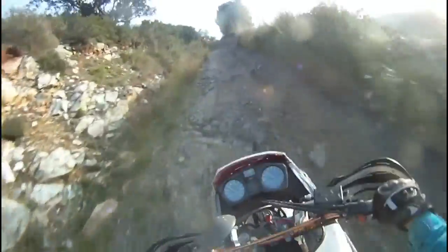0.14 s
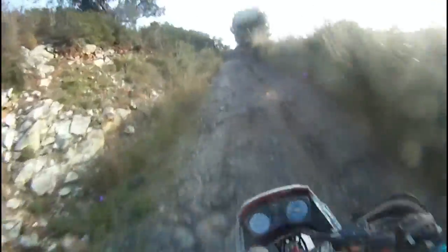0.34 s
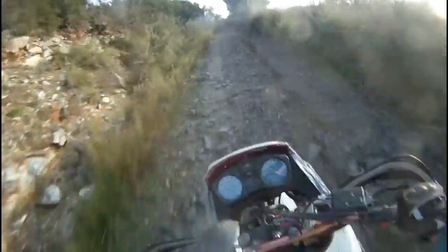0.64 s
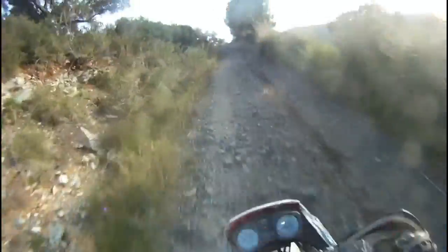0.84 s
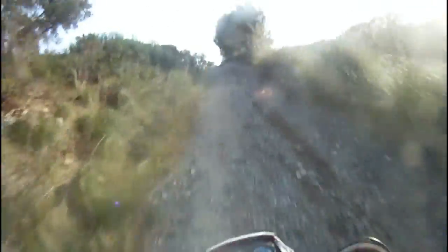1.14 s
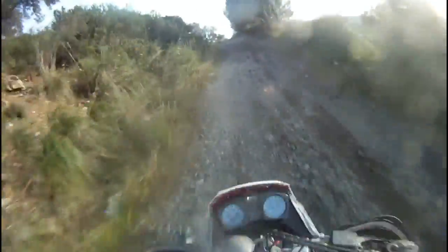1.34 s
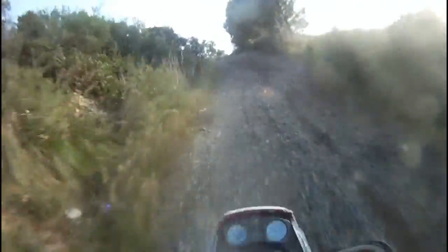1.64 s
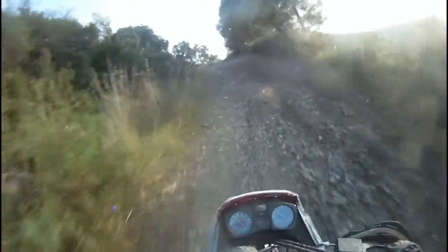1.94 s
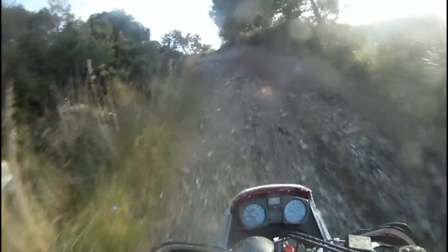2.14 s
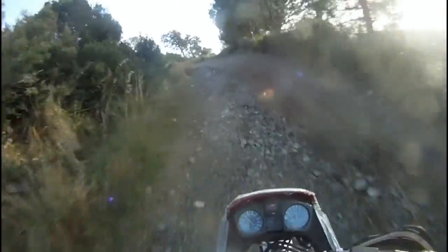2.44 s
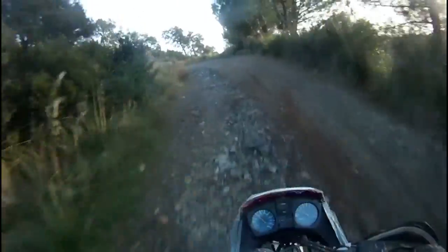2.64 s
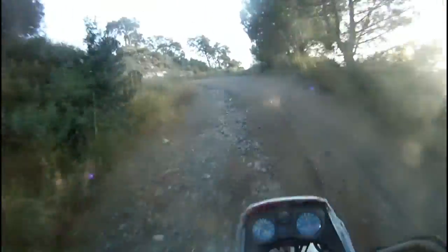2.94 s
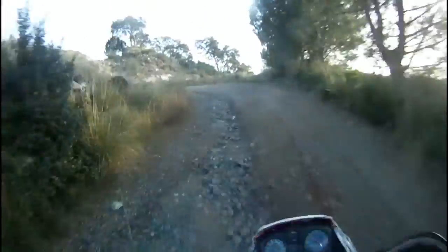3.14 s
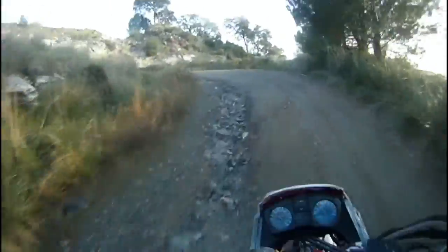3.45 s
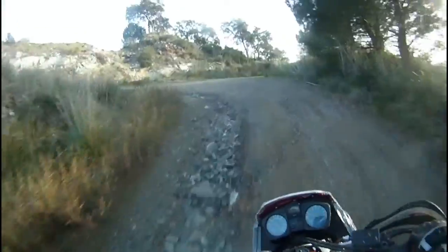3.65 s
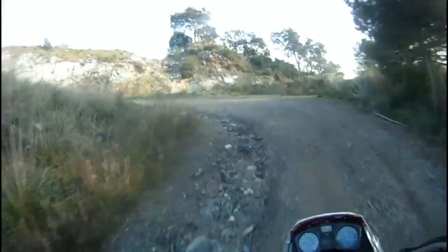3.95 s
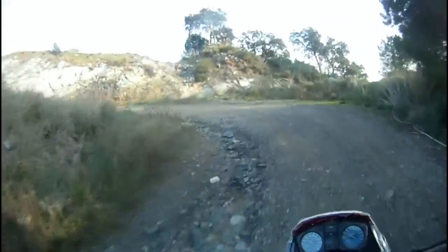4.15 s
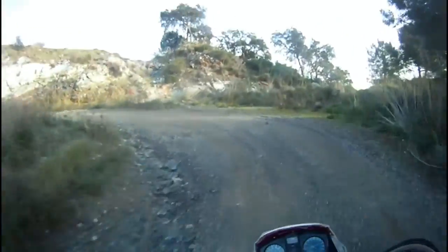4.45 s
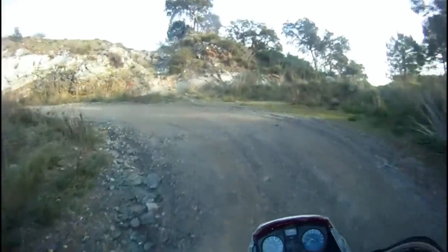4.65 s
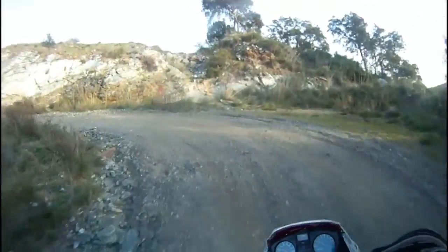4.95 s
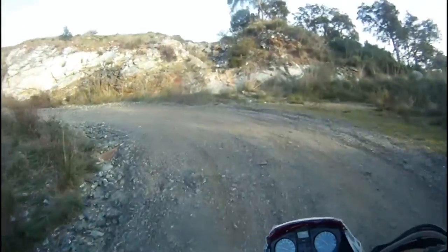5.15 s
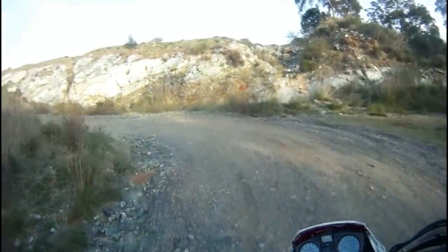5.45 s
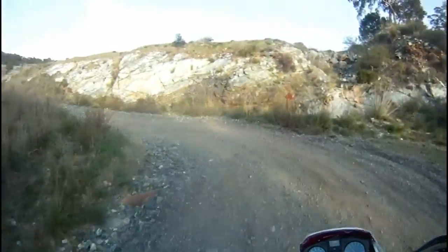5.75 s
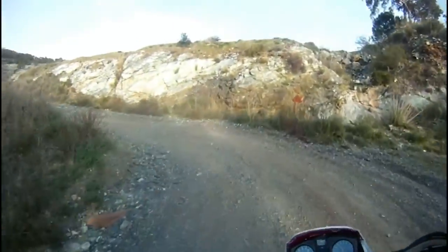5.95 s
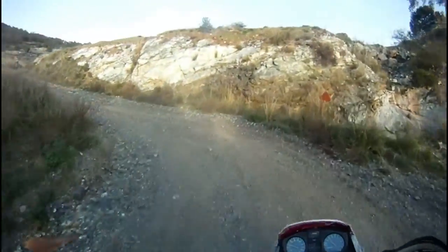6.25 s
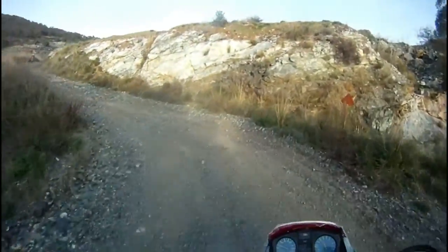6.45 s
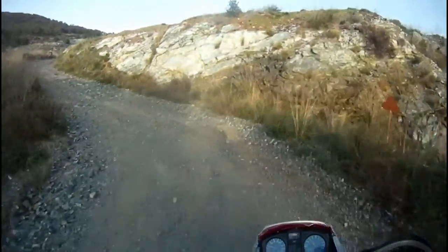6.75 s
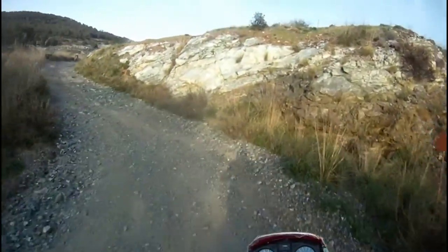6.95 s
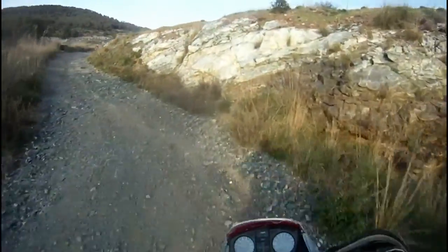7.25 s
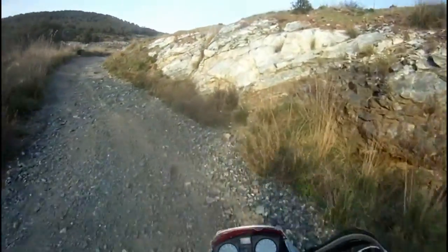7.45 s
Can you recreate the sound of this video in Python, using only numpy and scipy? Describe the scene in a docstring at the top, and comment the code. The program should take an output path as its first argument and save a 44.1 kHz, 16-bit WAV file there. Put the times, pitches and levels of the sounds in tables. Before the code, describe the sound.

Close onboard sound of a rattly motorbike on stony ground. It begins loud: rapid chugging strokes, loose metal clatter, whining gears, hissing tyres and low wind gusts, the throttle jerking the pitch up and down. A cluster of short knocks rattles by. Then the bike slows, strokes become more separate and the gravel rush thins out. Finally the engine pulls again more softly round a bend, with metallic ticking and a brief low thump. The microphone sounds small, boxed-in and grainy.

```python
"""A single-cylinder four-stroke motorcycle lugs up a gravel track, heard from a camera on the rider.
First firing bursts bark, thud and clatter, gear teeth whine, and noise makes tyre rush and wind gusts.
From 0.46 s, faintly at first, short noise knocks rattle; after 3.3 s rush and firing rate sink.
From 5.3 s it pulls through a bend with valve ring and one late deep thump as the throttle opens.
Throughout, the camera samples coarsely, which mirrors the sound into the treble."""
import sys
import numpy as np
from scipy import signal
from scipy.fft import rfft, irfft, next_fast_len
from scipy.io import wavfile
from scipy.ndimage import uniform_filter1d, map_coordinates

SR = 44100
rng = np.random.default_rng(int(sys.argv[2]) if len(sys.argv) > 2 else 0)


def unload_audio(sound):
    """Save the sound as a 16-bit wav file, at the path given as the first command line argument."""
    columns = np.transpose(np.atleast_2d(sound))
    # keep every value between -1 and 1, then stretch to whole-number steps
    steps = np.round(np.clip(columns, -1, 1) * 32767)
    wavfile.write(sys.argv[1], SR, steps.astype(np.int16))


N = 335160
TIME = np.arange(N) / SR  # s


# firing rate, one firing per engine cycle: [t/s, f/Hz]
FIRING_RATE = [(0.0, 24.63), (1.13, 27.54), (1.54, 25.22), (1.88, 30.02), (2.22, 23.1), (2.34, 32.0),
               (2.61, 24.34), (3.33, 26.17), (3.44, 20.85), (3.68, 17.02), (3.84, 26.3), (4.16, 20.16),
               (4.51, 15.9), (4.96, 17.5), (5.02, 19.4), (5.35, 19.1), (5.44, 21.4), (5.76, 21.25),
               (5.92, 27.3), (6.25, 20.52), (6.37, 25.17), (6.75, 25.75), (6.84, 21.36), (7.06, 24.57),
               (7.24, 19.71), (7.6, 20.99)]
# relative spectrum of loose metal, also heard in the knocks: [f/Hz, level/dB per Hz]
CLATTER_SPECTRUM = [(100, -23), (250, -8.5), (500, -6), (800, -9), (1150, -2.5), (1450, -3), (1750, -6.5),
                    (2300, -6.5), (2900, -20), (4100, -22), (5800, -20)]
# relative strength of the crank shake: [multiple of the firing rate, level/dB]
CRANK_SHAKE = [(2, 0.5), (3, -30.5), (4, -1), (5, -4)]


def engine(cycles, effort_db):
    """Each firing barks, thuds and sets off a burst of clatter, over the low shake of the crank."""
    speed, = curves(FIRING_RATE)
    effort_change_db = effort_db - effort_db.mean()

    # slow strokes on an open throttle bark the most
    throttle = np.minimum(1, amp(effort_change_db / 2))
    slow_stroke = np.minimum(1, 21 / speed) ** 2
    bark = amp(.5) * throttle * slow_stroke * barks(cycles, scatter_db=1.5, jitter_s=.00008)

    thud = amp(-6.0) * thuds(cycles, scatter_db=1.5, jitter_s=0.00012)

    burst = swell(cycles, lag=-.04, depth_db=6)
    loose_metal = rng.standard_normal(N) * burst * amp(2.0 * wobble(260))
    clatter = amp(5.0) * housed(loose_metal, CLATTER_SPECTRUM)

    shake = np.zeros(N)
    for order, db in CRANK_SHAKE:
        shake += amp(db + 2 * wobble(6)) * np.sin(2 * np.pi * order * cycles)
    # the engine rocks harder under load
    shake = amp(-40.5 + 0.33 * effort_change_db) * unit(shake)
    return amp(effort_db) * (bark + thud + clatter) + shake


# exhaust resonances, time counted from the firing, relative levels: [t/s, length/s, f/Hz, level/dB]
EXHAUST_BARKS = [(-.017, .028, 232, -2.5), (-.013, .014, 305, 0), (-.009, .014, 415, 0),
                 (-.007, .018, 545, -2), (-.004, .013, 610, -6), (.007, .016, 400, -8)]


def barks(cycles, scatter_db, jitter_s):
    """Nearly the same puff of gas in every cycle, so the strokes stack into low harmonics."""
    firings = np.interp(np.arange(1, int(cycles[-1]) + 1), cycles, TIME)
    out = np.zeros(N + SR)
    for delay, length, hz, db in EXHAUST_BARKS:
        chance = rng.standard_normal((len(firings), 2))
        t = np.arange(int(length * SR)) / SR
        puff = np.sin(2 * np.pi * hz * t) * np.sin(np.pi * t / length)
        puffs = puff * amp(db + scatter_db * chance[:, 1:])
        starts = np.abs(firings[:, None] + delay + jitter_s * chance[:, :1])
        at = (starts * SR).astype(int) + np.arange(len(t))
        out += np.bincount(at.ravel(), puffs.ravel(), N + SR)
    return housed(out[:N], [(100, 2.5), (700, -4.5)])


# blows within one engine cycle, relative levels: [share of the cycle after the firing, level/dB]
CYCLE_BLOWS = [(-.19, -11.5), (-.08, -5), (0, 3), (0.118, -9.5), (0.502, -4.5)]
# relative spectrum of a blow: [f/Hz, level/dB per Hz]
THUD_SPECTRUM = [(25, -48), (60, -4), (100, -3), (160, 13), (300, 3), (550, -18), (720, -13), (1000, -14),
                 (1400, -3), (2200, -2), (3500, -10), (5500, -46)]


def thuds(cycles, scatter_db, jitter_s):
    """The same run of blows in every cycle, each a little off in size and time."""
    turn = np.arange(int(cycles[-1]) + 2)
    blows = np.zeros(N)
    for share, db in CYCLE_BLOWS:
        chance = rng.standard_normal((len(turn), 2))
        at = np.interp(turn + share, cycles, TIME, left=-1, right=-1)
        at = at + jitter_s * chance[:, 0]
        heard = (at > 0) & (at < TIME[-1])
        sizes = amp(db + scatter_db * chance[heard, 1])
        blows += np.bincount((at[heard] * SR).astype(int), sizes, N)
    return housed(blows, THUD_SPECTRUM)


# twists of the throttle, short blips add to long pulls: [t/s at the start, length/s, level/dB]
THROTTLE_TWISTS = [(-.07, 0.059, -21.5), (.08, 1.53, -39.5), (0.4, 0.071, -36), (1.22, 0.29, -43.5),
                   (1.513, 0.058, -36), (1.732, 0.37, -45), (2.212, 0.12, -34.5), (2.3, .76, -40.5),
                   (2.596, 0.067, -39.5), (3.149, 0.16, -37), (3.738, 0.18, -39), (3.947, 0.94, -51.5),
                   (4.934, 0.13, -42.5), (5.128, 2.067, -44.5), (5.33, 0.45, -50.5), (5.786, .14, -41),
                   (6.048, 0.058, -37.5), (6.285, .11, -38), (6.6, 0.088, -42), (6.855, .08, -40.5),
                   (7.265, .4, -46.5), (7.534, 0.082, -49)]
OPEN_S, CLOSE_S, IDLE_DB = 0.032, 0.047, -53  # the pull builds, dies away, and rests at this level


def pull():
    """How hard the engine pulls, in dB: every twist of the throttle adds to the idle."""
    twists = sum(amp(db) * held(start, length, OPEN_S, CLOSE_S) for start, length, db in THROTTLE_TWISTS)
    return 20 * np.log10(amp(IDLE_DB) + twists)


# relative spectrum of the ringing gear case: [f/Hz, level/dB per Hz]
GEARCASE_SPECTRUM = [(500, -26.5), (1000, -13), (1150, 1), (1320, 8), (1490, 1.5), (1680, 0), (2000, -9),
                     (4000, -36.5)]


def gears(cycles, effort_db, kick, flutter, hash_db):
    """Teeth mesh at a multiple of the crank speed, which leaps at each firing and sags until the next."""
    meshes_per_cycle, surge, rough = 69, .06, .32
    speed, = curves(FIRING_RATE)
    # kick is the share of the cycle in which the crank speeds up
    saw = np.interp((cycles + 0.083) % 1, [0, kick, 1], [-1, 1, -1])
    # the crank surges most when it pulls hard at low speed
    swing = surge * (20 / speed) ** 2 * amp((effort_db - effort_db.mean()) / 4)
    pitch = meshes_per_cycle * speed * (1 + swing * saw + flutter * wobble(220))
    tone = np.sin(2 * np.pi * np.cumsum(pitch) / SR) * (1 + rough * wobble(300))
    # the teeth are loaded by compression and again by the power stroke
    load = swell(2 * cycles, lag=.2, depth_db=2.5)
    whine = housed(tone * load, GEARCASE_SPECTRUM)
    # at higher speed the teeth rattle and the whine turns to a hash
    rattle = amp(hash_db) * (speed / 24) ** 2 * housed(rng.standard_normal(N), GEARCASE_SPECTRUM)
    return amp(whine_level(effort_db, speed)) * (whine + rattle)


# the whine swells (+) or fades (-): [t/s at the start, length/s, level/dB]
WHINE_SWELLS = [(1.59, 0.58, -9.5), (3.394, 0.69, 3), (4.22, 0.45, -5), (4.444, 0.2, -2.5), (4.677, 0.6, 1),
                (4.856, 0.12, -5), (5.372, 0.43, -2.5), (7.238, 0.17, 2)]
WHINE_SWELL_S = 0.0097  # time constant at the start and end of each
# at mean pull and speed; dB per dB of pull; dB per firing a second
WHINE_DB, WHINE_PER_PULL, WHINE_PER_SPEED_DB = -36, 0.084, 0.16


def whine_level(effort_db, speed):
    """Level in dB: it follows the pull and the speed, plus the swells and fades of the whine."""
    swells_db = sum(db * held(start, length, WHINE_SWELL_S, WHINE_SWELL_S)
                    for start, length, db in WHINE_SWELLS)
    pull_db = WHINE_PER_PULL * (effort_db - effort_db.mean())
    speed_db = WHINE_PER_SPEED_DB * (speed - speed.mean())
    return WHINE_DB + pull_db + speed_db + swells_db


# ringing tones of the valve gear, relative levels: [f/Hz, level/dB]
VALVE_TONES = [(3110, -2), (3680, -5.5), (4615, -3), (5400, -14.5)]


def valves(cycles, db):
    """The valves seat twice a cycle; their ring stands out while the bike pulls through the bend."""
    bend = np.interp(TIME, [5.25, 5.45, 7.1, 7.22], [.15, 1, 1, .15])
    ages = [(cycles - share) % 1 for share in (.24, .56)]  # in cycles since each seating
    ticks = unit(sum(age * np.exp(-age / .06) for age in ages))
    ring = np.zeros(N)
    for hz, level in VALVE_TONES:
        ring += amp(level) * np.sin(2 * np.pi * hz * TIME + wobble(120)) * amp(2 * wobble(35))
    return amp(db) * bend * ticks * ring


# short knocks, many on the firing strokes, level before the rise and decay shape it: [t/s, level/dB]
KNOCKS = [(0.459, -27), (1.147, -15), (1.317, -13), (1.367, -8), (1.406, -8.5), (1.446, -16),
          (1.516, -11.5), (1.571, -17), (2.629, -17), (3.227, -16), (3.784, -16), (4.33, -23),
          (4.684, -21.5), (5.674, -17), (5.855, -20), (6.266, -16.5), (6.319, -12), (6.882, -16.5),
          (6.929, -17.5), (7.187, -15.5)]


def knocks(t60, rise_s):
    """Each knock is a short loose rattle: noise that rises fast and dies away."""
    t = np.arange(SR // 8) / SR
    shape = amp(-60 * t / t60) * (1 - np.exp(-t / rise_s))
    envelope = np.zeros(N + SR)
    for s, db in KNOCKS:
        envelope[round(s * SR):][:len(t)] += amp(db) * shape
    return envelope[:N] * housed(rng.standard_normal(N), CLATTER_SPECTRUM)


# relative spectrum of tyre and air rush: [f/Hz, level/dB per Hz]
RUSH_SPECTRUM = [(60, 11.5), (200, 1), (500, -7.5), (850, -1), (1150, -1), (1700, 0), (2400, 1.5),
                 (3100, -1.5), (3700, -10), (4100, -12.5), (4700, -6.5), (5450, -7), (5900, -12)]


def track(rush_db, stones_per_s, stone_db):
    """Air and tyres rush as unsteady noise; single stones crackle in the tread."""
    struck = rng.random(N) < stones_per_s / SR
    stones = struck * rng.standard_normal(N) * amp(2 * rng.standard_normal(N))
    rush = rng.standard_normal(N) * amp(0.99 * wobble(35))
    grit = rush + amp(stone_db) * unit(stones)
    return amp(rush_db + 8) * housed(grit, RUSH_SPECTRUM)


# gusts on the camera and, in the last row, a deep thump as the throttle opens:
# [t/s at the peak, length/s, buffet level/dB, deep pressure level/dB]
LOW_PULSES = [(0, 0.086, -23.5, -18.5), (0.258, 0.26, -20.5, -27), (0.457, 0.059, -20, -43),
              (0.567, 0.27, -29, -23), (0.77, 0.14, -21.5, -40), (1.29, .1, -27, -31),
              (1.477, 0.13, -24.5, -36), (2.042, 0.17, -25, -47), (2.278, 0.11, -20.5, -63),
              (2.61, 0.11, -23.5, -49), (3.114, 0.11, -27.5, -34), (3.478, 0.096, -27.5, -50),
              (3.64, 0.1, -26, -59), (6.322, 0.13, -47, -37)]
# relative spectrum of the buffet: [f/Hz, level/dB per Hz]
BUFFET_SPECTRUM = [(20, -20), (45, -14), (65, -6), (82, 4), (100, -3), (130, -14), (200, -23.5),
                   (400, -31.5), (700, -42), (1500, -70)]
# relative spectrum of the deep pressure: [f/Hz, level/dB per Hz]
DEEP_SPECTRUM = [(10, -5), (22, -2), (34, -4), (55, -2), (80, -1), (200, -31), (600, -41.5)]
# between the pulses: level at mean rush, dB per dB of rush
BUFFET_DB, BUFFET_PER_RUSH = -34.5, 0.37
DEEP_DB, DEEP_PER_RUSH = -45, 1


def headwind(rush_db, restless_db):
    """Buffet and deep pressure follow the pace of the bike; bell-shaped gusts and a late thump ride on top."""
    pace_db = rush_db - rush_db.mean()
    buffet = amp(BUFFET_DB + BUFFET_PER_RUSH * pace_db + restless_db * wobble(12))
    deep = amp(DEEP_DB + DEEP_PER_RUSH * pace_db + restless_db * wobble(5.26))
    for s, length, buffet_db, deep_db in LOW_PULSES:
        bell = np.exp(-(2 * (TIME - s) / length) ** 2)
        buffet = np.hypot(buffet, amp(buffet_db) * bell)
        deep = np.hypot(deep, amp(deep_db) * bell)
    return wind(20 * np.log10(buffet), BUFFET_SPECTRUM) + wind(20 * np.log10(deep), DEEP_SPECTRUM)


def wind(level_db, spectrum):
    """Eddies boom in the housing, evened out so that they swell with the given level."""
    eddies = housed(rng.standard_normal(N), spectrum)
    strength = np.sqrt(np.abs(uniform_filter1d(eddies ** 2, size=SR // 12)) + 0.12)
    return amp(level_db) * eddies / strength


# resonances of the camera housing: [f/Hz, width/Hz, level/dB]
HOUSING_MODES = [(254, 61, 3), (395, 39, 3), (552.6, 14, 8.5), (609, 11.7, 7.5), (1006, 47, 6),
                 (1153.4, 98, 12.5), (1236, 29, 11), (1418.6, 53, 8.5), (1528, 142, 8.5), (1792, 59, 4),
                 (2143, 385, 9), (2780, 410, 3.5), (3637, 385, 10.5)]


def housed(x, spectrum, size=8192):
    """Colour x causally by a spectrum and by the ringing housing; rms 1."""
    hz = np.fft.rfftfreq(size, 1 / SR)
    f, level = np.transpose(spectrum)
    db = np.interp(np.log(hz + 1), np.log(f), level)
    for centre, width, peak in HOUSING_MODES:
        db = db + peak / (1 + (2 * (hz - centre) / width) ** 2)
    # folding the cepstrum makes the response minimum-phase
    cepstrum = irfft(np.log(amp(db)))
    cepstrum[1:size // 2] *= 2
    cepstrum[size // 2 + 1:] = 0
    impulse = irfft(np.exp(rfft(cepstrum)))
    return unit(signal.fftconvolve(x, impulse)[:N])


def swell(cycles, lag, depth_db):
    """A gain of rms 1 that peaks once in each cycle counted."""
    return unit(amp(depth_db * np.cos(2 * np.pi * (cycles - lag))))


def held(start, length, rise_s, fall_s):
    """A gain that rises towards 1, holds and dies away."""
    age = np.maximum(TIME - start, 0)
    rise = 1 - np.exp(-np.minimum(age, length) / rise_s)
    fall = np.exp(-np.maximum(age - length, 0) / fall_s)
    return rise * fall


def wobble(rate):
    """A smooth random curve, rate knots a second."""
    return map_coordinates(rng.standard_normal(int(N * rate / SR) + 4), [TIME * rate])


def curves(rows):
    """One value per sample for each column after the time."""
    s, *cols = np.transpose(rows)
    return [np.interp(TIME, s, c) for c in cols]


def amp(db):
    """Decibels to gain."""
    return 10 ** (np.asarray(db) / 20)


def unit(x):
    """Scale to rms 1."""
    return x / np.sqrt(np.mean(x ** 2) + 1e-20)


def filtered(x, response):
    """x times a response of frequency."""
    m = next_fast_len(N + SR // 2)
    return irfft(rfft(x, m) * response(np.fft.rfftfreq(m, 1 / SR)), m)[:N]


# pace of the tyre and air rush, falling as the bike slows for the bend; track adds 8 dB: [t/s, level/dB]
RUSH_LEVEL = [(0, -33.5), (.75, -34), (1.6, -31), (2.4, -37), (3.25, -36.5), (3.55, -40), (3.9, -40),
              (4.3, -48), (4.85, -55), (5.2, -53), (5.4, -48), (6.4, -49.5), (7.6, -53)]
SPRAY_PER_PULL = 0.13  # the rear tyre digs in: dB of rush per dB of pull
BUMP_DB, BUMPS_PER_S = 1.24, 11  # the rush rises and falls over the uneven ground


def scene():
    """All sources ride along with the camera."""
    speed, = curves(FIRING_RATE)
    rush_db, = curves(RUSH_LEVEL)
    cycles, effort_db = np.cumsum(speed) / SR, pull()
    motor = engine(cycles, effort_db)
    whine = gears(cycles, effort_db, kick=0.2, flutter=0.01088, hash_db=2.5)
    metal = valves(cycles, db=-49.5) + knocks(t60=0.037, rise_s=0.0016)
    ground_db = SPRAY_PER_PULL * (effort_db - effort_db.mean()) + BUMP_DB * wobble(BUMPS_PER_S)
    tyres = track(rush_db + ground_db, stones_per_s=700, stone_db=-5.5)
    return (motor + whine + metal + tyres + headwind(rush_db, restless_db=1.0))[None]


SAMPLE_HZ, EDGE_HZ, TOP_HZ = 12000, 5620, 15350  # coarse rate, band edge before it, limit after it


def record(dry):
    """The camera holds each coarse sample, so the sound is mirrored round its sampling rate."""
    band = filtered(dry[0], lambda hz: 1 / np.sqrt(1 + (hz / EDGE_HZ) ** 60))
    mirrored = band * (1 + 2 * np.cos(2 * np.pi * SAMPLE_HZ * TIME))
    # holding each sample dulls the treble as a sinc
    return filtered(mirrored, lambda hz: np.sinc(hz / SAMPLE_HZ) * (hz < TOP_HZ))[None]


dry = scene()
out = record(dry)
unload_audio(out)
```